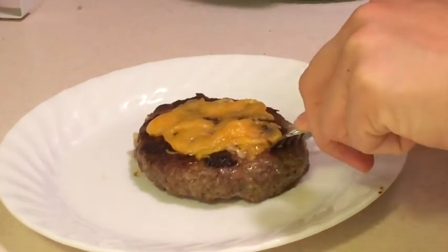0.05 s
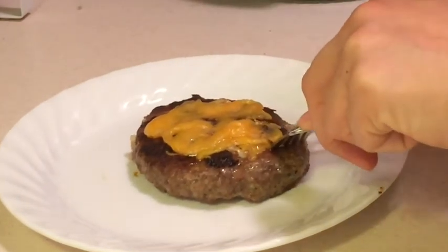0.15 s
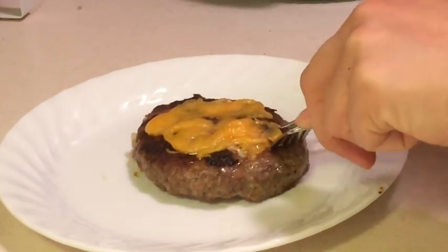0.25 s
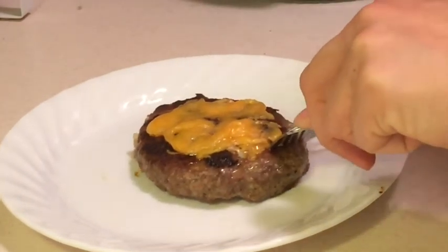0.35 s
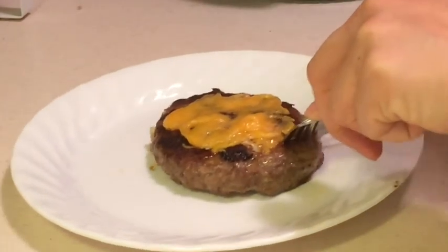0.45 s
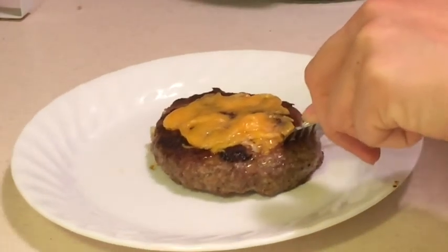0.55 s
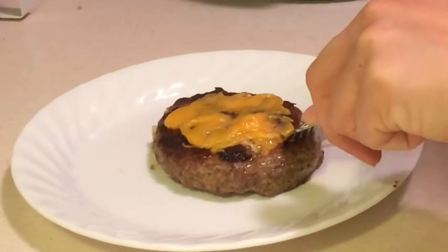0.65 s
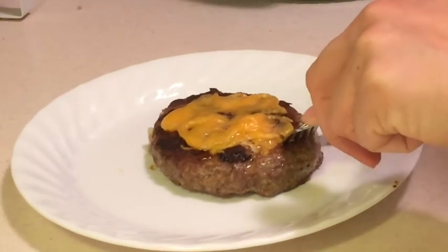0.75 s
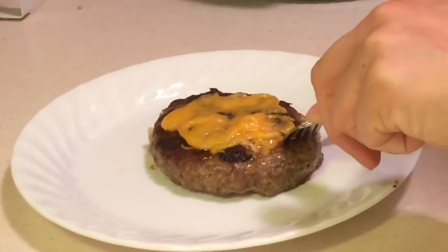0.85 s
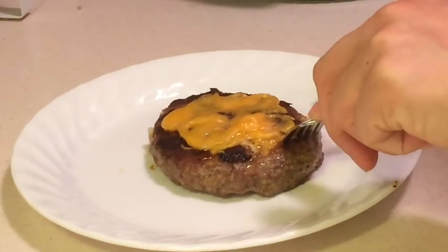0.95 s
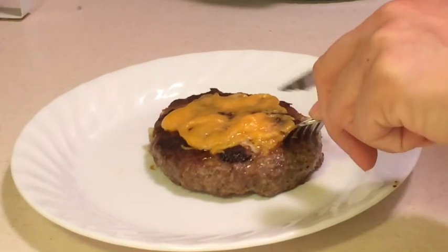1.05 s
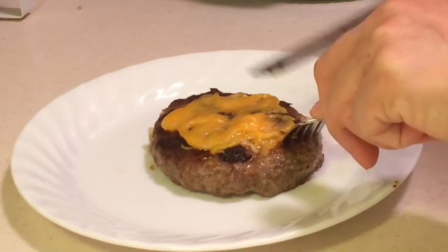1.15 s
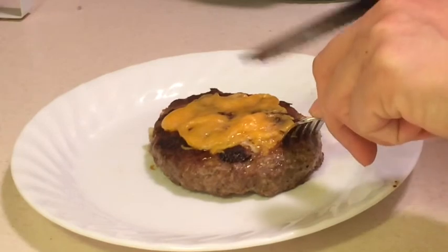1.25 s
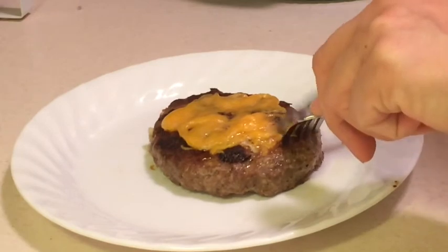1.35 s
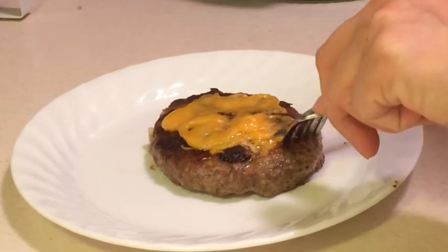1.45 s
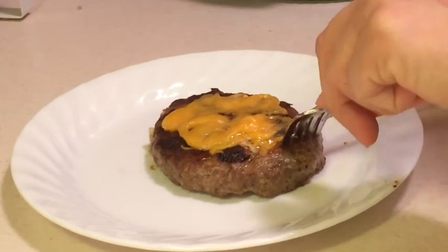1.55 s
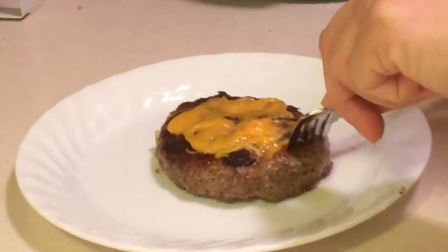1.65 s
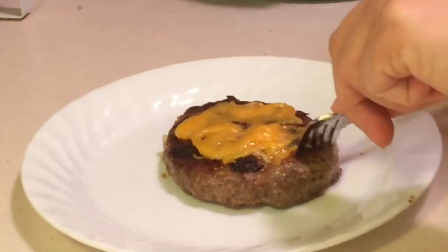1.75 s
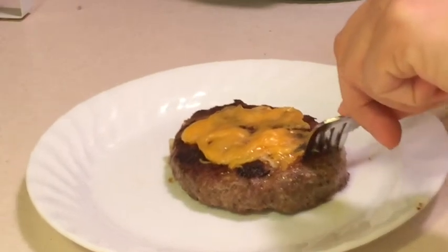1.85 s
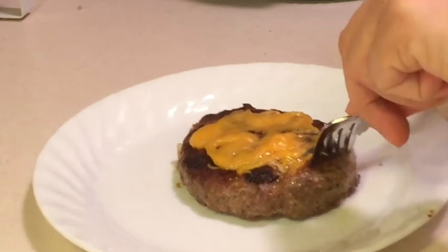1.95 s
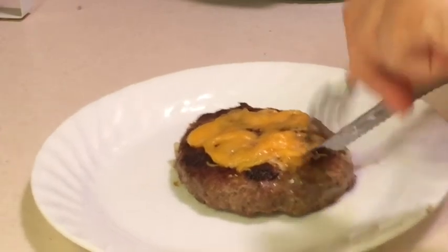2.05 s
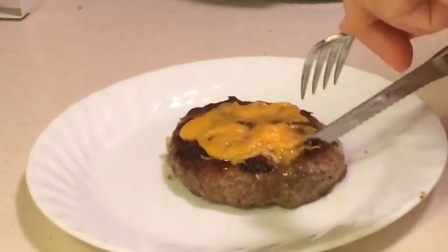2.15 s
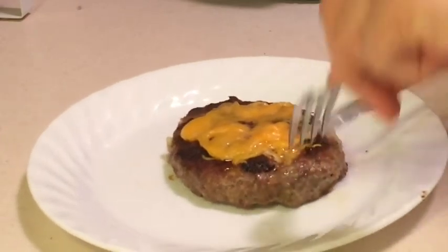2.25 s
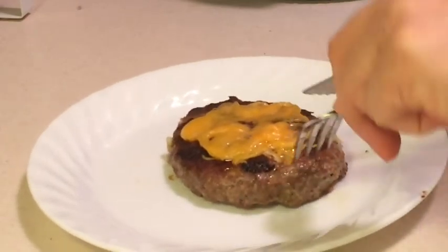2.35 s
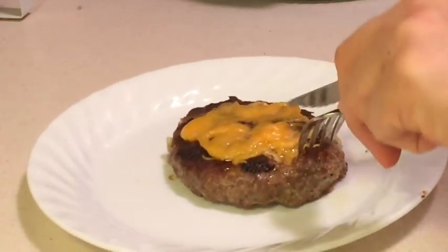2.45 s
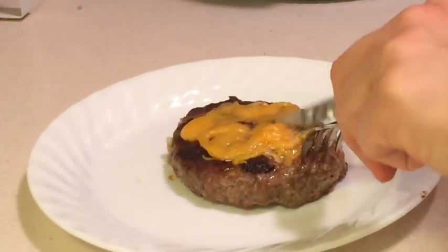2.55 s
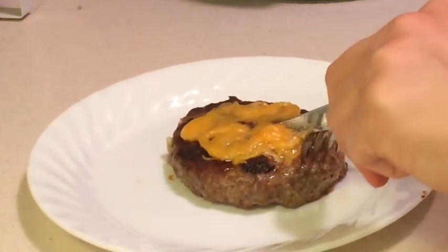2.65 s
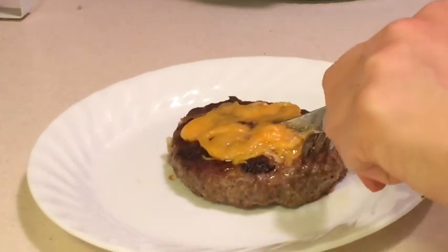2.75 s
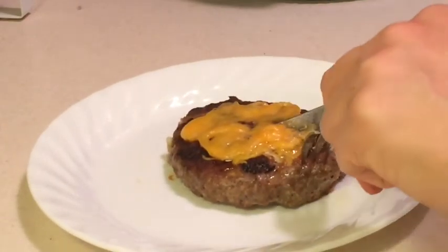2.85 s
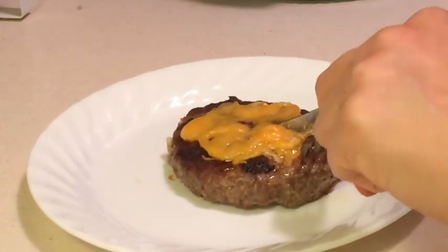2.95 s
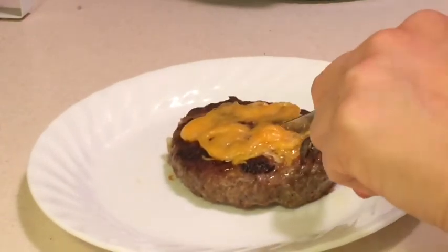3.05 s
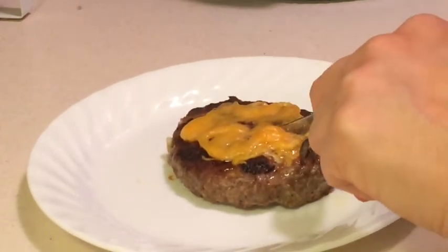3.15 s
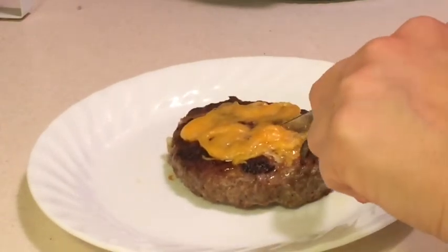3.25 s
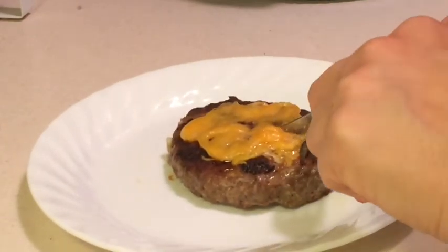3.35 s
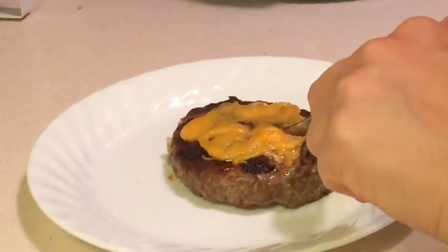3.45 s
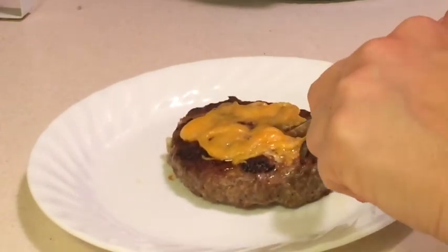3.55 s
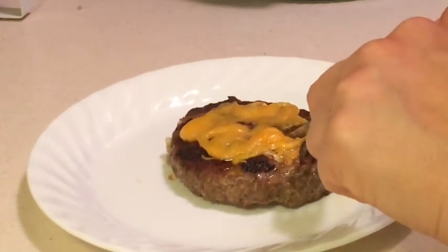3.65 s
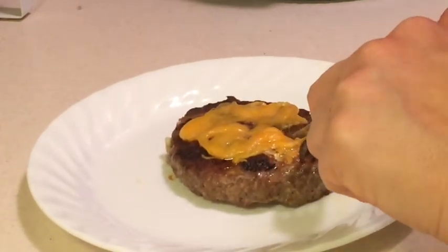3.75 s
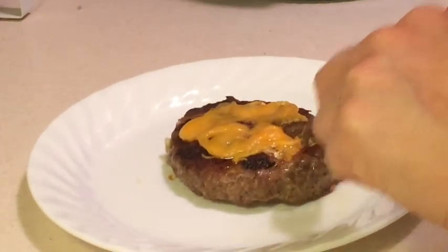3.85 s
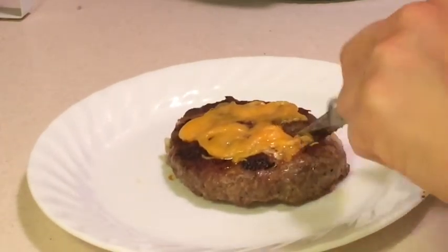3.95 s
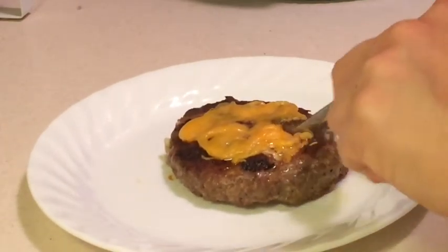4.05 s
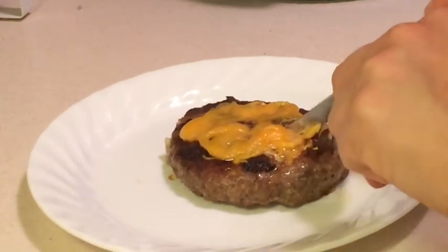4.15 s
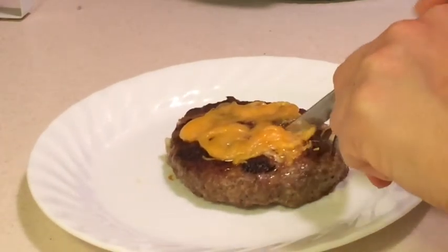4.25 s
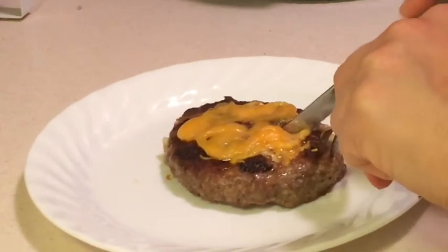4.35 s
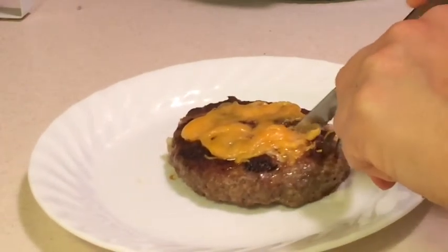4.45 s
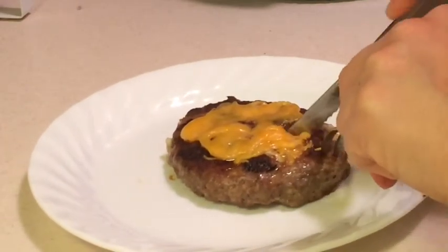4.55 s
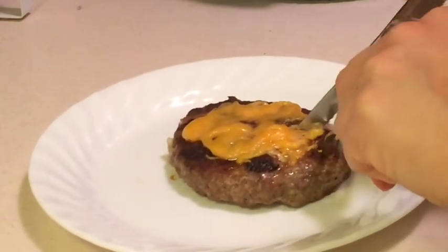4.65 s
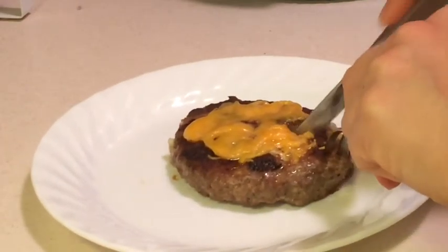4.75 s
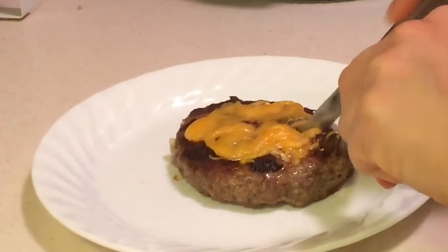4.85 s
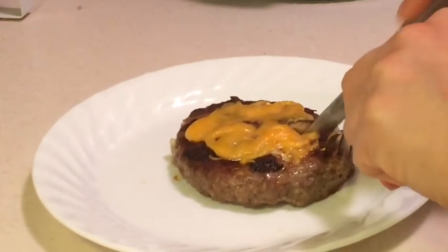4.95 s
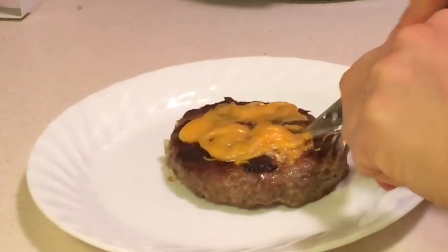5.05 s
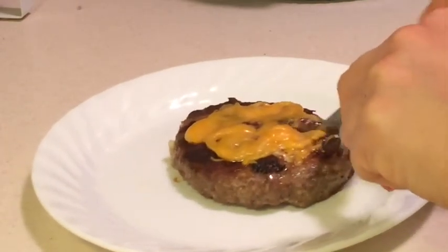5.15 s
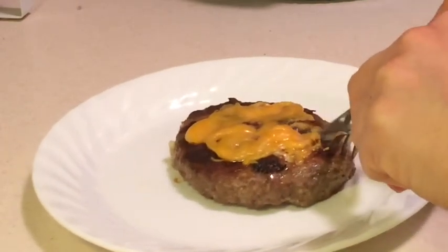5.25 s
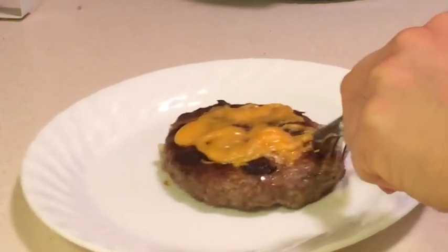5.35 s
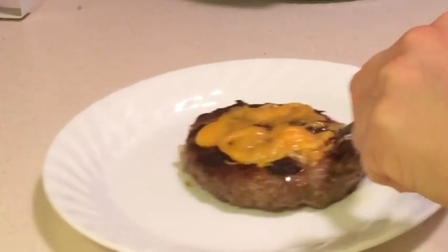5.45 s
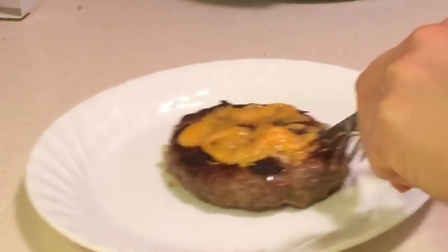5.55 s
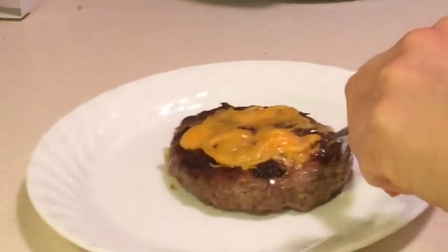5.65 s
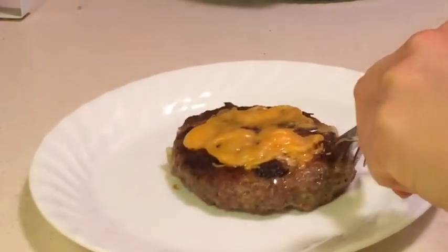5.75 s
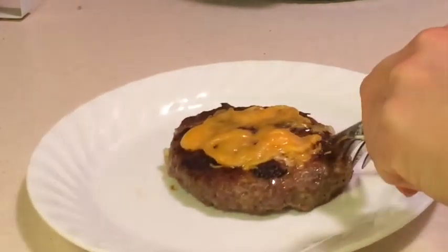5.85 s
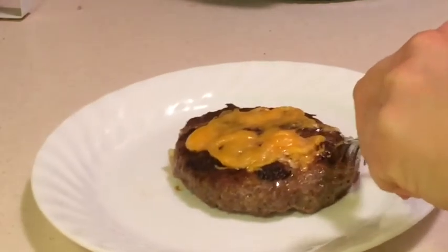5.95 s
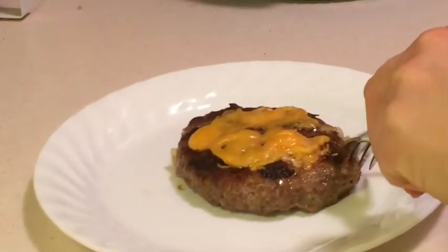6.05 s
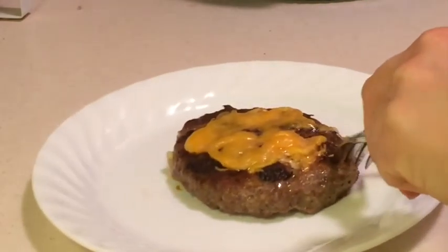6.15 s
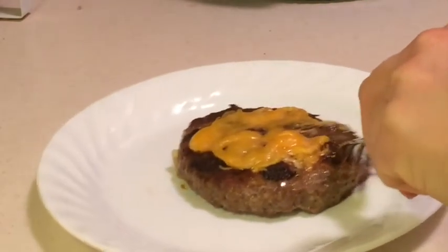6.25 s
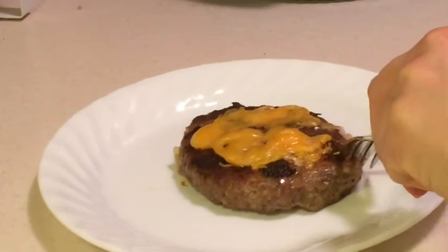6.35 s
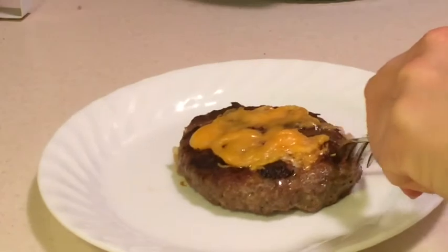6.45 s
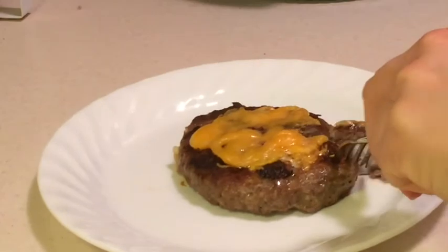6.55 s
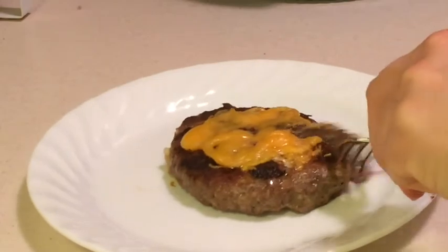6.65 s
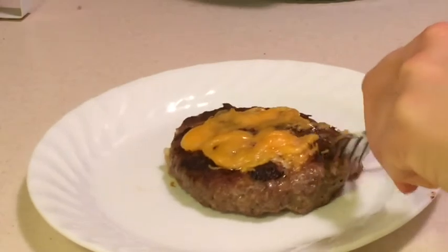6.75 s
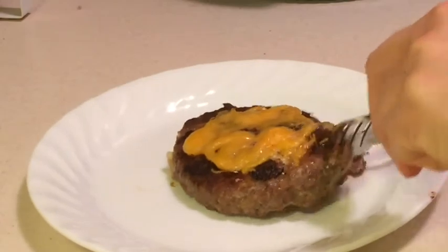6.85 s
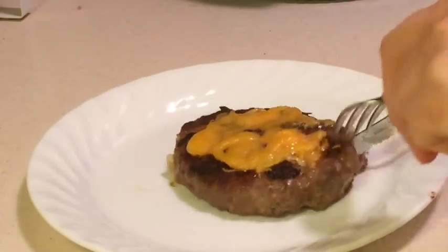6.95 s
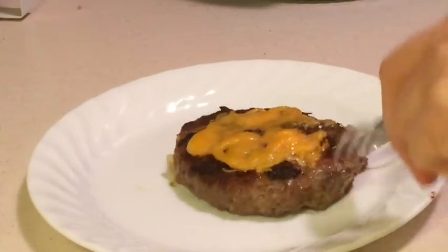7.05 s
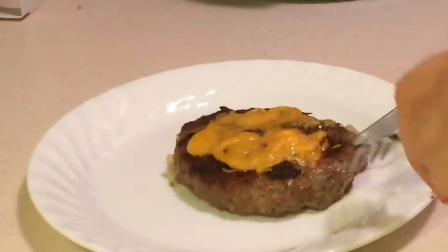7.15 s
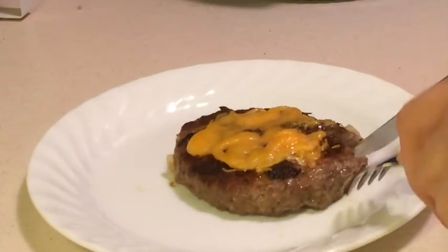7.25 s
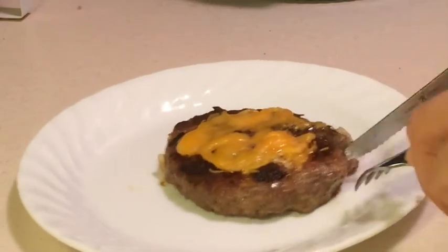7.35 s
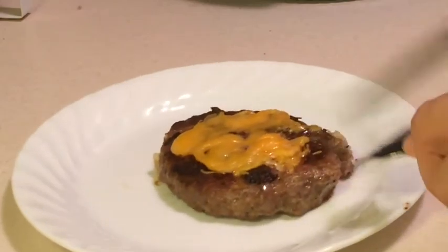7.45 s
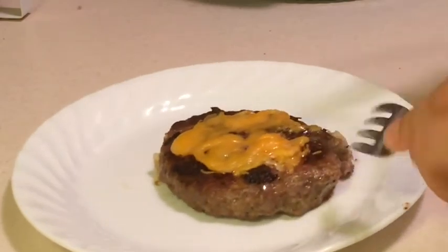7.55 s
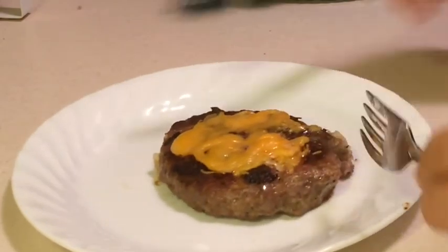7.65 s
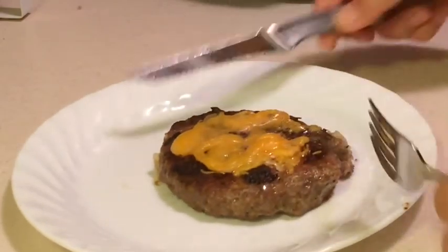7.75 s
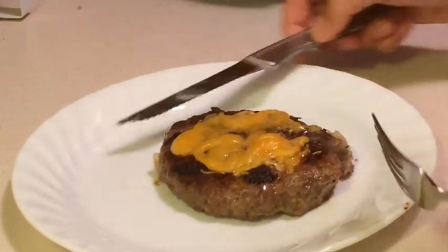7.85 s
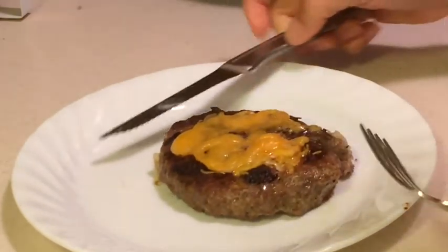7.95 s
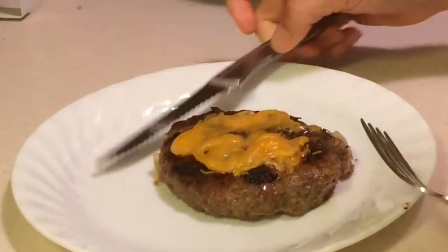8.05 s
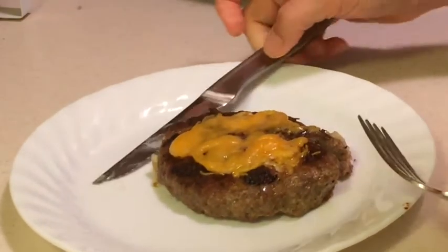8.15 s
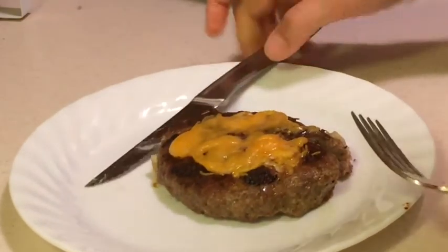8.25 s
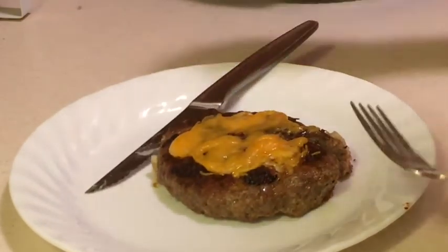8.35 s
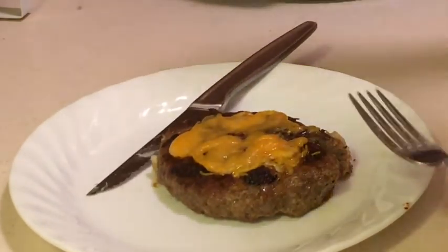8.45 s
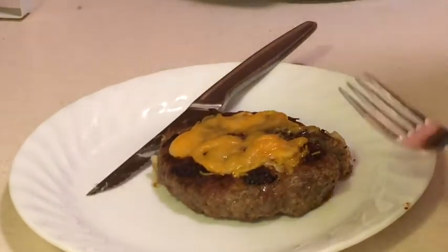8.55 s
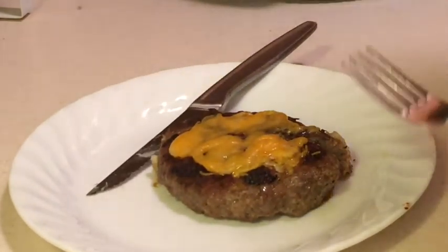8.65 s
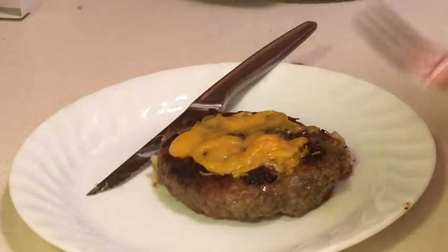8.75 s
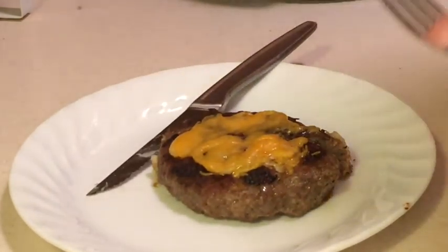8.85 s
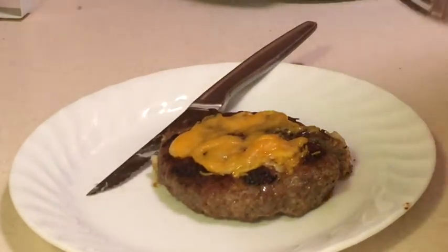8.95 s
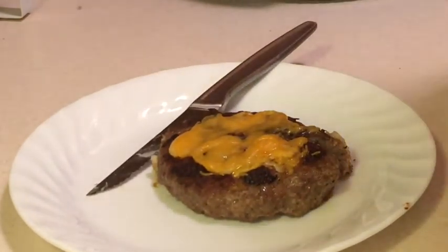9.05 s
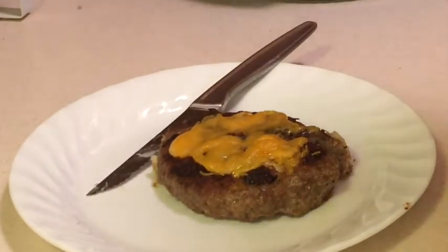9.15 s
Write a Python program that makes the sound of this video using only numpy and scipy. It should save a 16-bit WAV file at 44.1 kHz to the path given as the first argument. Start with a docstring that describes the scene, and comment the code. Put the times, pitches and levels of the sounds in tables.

```python
"""First, meat rustles and juices tick as a knife and fork cut a patty on a ceramic plate in a quiet kitchen.
Steel taps ring crowds of damped plate modes; strokes combine filtered clicks, plate graze and soft thuds.
The knife is laid down: it bounces, clatters on the rim and settles, as struck and chattering modes.
A far appliance hums in filtered noise; gain control ducks loud sound, notably the clatter, then recovers."""
import sys
import numpy as np
from scipy import signal
from scipy.fft import rfft, irfft, next_fast_len
from scipy.io import wavfile
from scipy.ndimage import uniform_filter1d

SR = 44100
rng = np.random.default_rng(int(sys.argv[2]) if len(sys.argv) > 2 else 0)


def persist_wave(psi):
    """Save psi, clipped to +-1, as 16-bit WAV."""
    counts = np.round(np.clip(psi, -1, 1) * 32767).astype(np.int16)
    wavfile.write(sys.argv[1], SR, np.atleast_2d(counts).T)


N = 405279

# Bass tilt: dB reached two octaves below 4.8 kHz. Treble tilt: dB per octave above it.
# Blow levels are nominal; mode t60 values are before damping.
# Steel taps the plate: (time [s], level [dB], bass tilt [dB], treble tilt [dB/octave])
PLATE_TAPS = [(0.2218, -23, -8.5, -1), (0.5414, -38, -12, 2), (4.8743, -22.5, -3, -10.5),
              (5.068, -45.5, 7, 1), (5.0955, -9.5, -3.5, -4.5), (5.3446, -12, -4.5, 2.5),
              (5.569, -23.5, -8.5, -2.5), (5.906, -25.5, -11, 1.5), (6.144, -16.5, -10, 3)]
TAP_DAMPING = 1.49
# Crowds of plate modes: (centre [Hz], spread [Hz], relative level [dB], median t60 [s])
PLATE_CROWDS = [(171, 33, 0.5, 0.046), (496.3, 25, -1.5, 0.11), (843, 250, -2, 0.069), (1068, 12, -9, .13),
                (1199, 156.6, -1.5, 0.12), (1773, 290, -20, 0.045), (2463, 190, -10, 0.064),
                (3449, 310, -1, 0.094), (4230, 260, -13.5, 0.12), (5340, 250, -17, 0.034),
                (6225, 300, -4, 0.11), (7170, 370, -15.5, 0.16), (10120, 270, -3.5, 0.066),
                (14100, 400, -21.5, .06)]
# Steel clinks: (time [s], fork level [dB], knife handle level [dB], fork bass tilt [dB])
STEEL_CLINKS = [(0.2213, -23, -55, 0), (.946, -54, -50.5, -8), (1.453, -30.5, -29, -5)]
# Crowds of modes of the buried tines: (centre [Hz], spread [Hz], relative level [dB], median t60 [s])
FORK_CROWDS = [(948, 68, 1, 0.053), (4380, 190, -2, .055), (7530, 90, -4, .05), (8230, 87, -6, .05),
               (9300, 100, -9, 0.054)]
# Knife tip bounces: (time [s], blade level [dB], handle level [dB])
TIP_BOUNCES = [(8.179, -28, -28.5), (8.2115, -29.5, -19), (8.232, -31, -28.5), (8.252, -40.5, -27.5)]
# Knife lands on the rim: (time [s], rim level [dB], blade level [dB], rim bass tilt [dB])
RIM_LANDINGS = [(8.281, -3, -9, -3), (8.2926, -8.5, -9.5, 3.5), (8.3004, 0, -21, -0.5),
                (8.308, -3, -22.5, 4.5), (8.319, -4, -20, -1), (8.328, -4, -19, -1), (8.346, -13, -23.5, 2),
                (8.367, -23.5, -34, 6)]
# Knife handle modes: (frequency [Hz], relative level [dB], t60 [s])
HANDLE_MODES = [(5650, 0, 0.13), (6800, -5.5, 0.065), (7400, -6, 0.13), (8000, -4.5, 0.085),
                (8740, -7, 0.06), (9760, -5, 0.1), (12780, -5, 0.1), (14250, -3.5, 0.11)]
# Knife blade modes: (frequency [Hz], relative level [dB], t60 [s])
BLADE_MODES = [(1530, -2, 0.076), (2170, -7, .06), (3690, -4, 0.055), (5280, 5.5, 0.056),
               (6410, -2.5, 0.076), (8880, -5.5, 0.072), (10700, -5, 0.07), (12940, -4, 0.084)]
# Modes of the plate's free rim: (frequency [Hz], relative level [dB], t60 [s])
RIM_MODES = [(242, -15, 0.17), (500, -13.5, 0.14), (1240, -7, 0.045), (1529, -7.5, 0.05), (1760, -6, 0.09),
             (2425, -4, 0.085), (2700, -6.5, 0.098), (3080, -3.5, 0.049), (4100, 0.5, 0.074),
             (4840, -3, .08), (5100, 5, 0.059), (6130, 1.5, 0.093), (7420, -1, 0.05), (8600, -6, .1),
             (10820, -7, 0.09), (11300, -10, 0.1), (12200, -7, .09), (14000, -7, .08), (15000, -9.5, .08)]
# Drags through the meat: (time [s], nominal length [s], rustle level [dB], plate graze level [dB])
MEAT_STROKES = [(0, 0.061, -58, -59), (0.227, 0.051, -54, -76), (0.347, 0.15, -59.5, -59.5),
                (0.42, 0.12, -53.5, -75), (0.669, 0.14, -60, -58.5), (1.643, 0.16, -58.5, -62),
                (1.812, 0.18, -61, -61.5), (2.076, 0.12, -53, -61), (2.44, 0.13, -65, -80),
                (3.898, 0.031, -62, -81), (4.199, 0.032, -64, -67), (4.31, 0.11, -62, -78),
                (4.49, 0.097, -64.5, -71), (4.686, 0.19, -59.5, -100), (4.821, 0.042, -57, -56),
                (5.018, 0.11, -55, -84), (5.138, 0.085, -59, -70), (5.252, 0.15, -54, -85),
                (5.447, 0.092, -52, -59), (5.555, 0.097, -53.5, -62), (5.703, 0.069, -57.5, -71),
                (5.888, 0.037, -50.5, -63), (5.98, 0.058, -62.5, -69.5), (6.19, 0.17, -58, -61),
                (6.396, 0.075, -58.5, -57.5), (6.533, 0.077, -52.5, -57), (6.629, 0.13, -57, -54.5),
                (6.966, 0.056, -62.5, -76), (7.303, 0.16, -62, -72), (7.762, 0.13, -61.5, -74),
                (8.76, 0.066, -68, -67)]
# Faint continuous rustle beneath the strokes:
# (time [s], nominal length [s], rustle level [dB], plate graze level [dB])
LOW_RUSTLE = [(0, 0.4, -64, -80), (4.2, 2.13, -67.5, -78)]
# Spectrum of the fibre rustle: (frequency [Hz], relative density [dB/Hz])
RUSTLE_SPECTRUM = [(300, -29.5), (1200, -1), (3000, -8), (6000, -9.5), (10000, -14.5), (15000, -20.5),
                   (16500, -35)]
# Clear wet ticks of meat and juice, plus at 4.834 s a tick-like light graze of steel: (time [s], level [dB],
# centre [Hz])
WET_TICKS = [(0.1077, -48, 9000), (0.1705, -51, 8300), (0.335, -51, 9000), (0.6684, -55, 11200),
             (0.7283, -48, 10900), (0.7786, -48, 6440), (0.933, -50, 6070), (1.0183, -53, 11000),
             (1.9424, -45, 5000), (2.139, -35.5, 9900), (2.2894, -53, 11100), (3.1537, -55, 11000),
             (3.4473, -56, 11000), (3.917, -35, 8300), (3.984, -52, 10300), (4.0755, -53, 7600),
             (4.0963, -53, 9700), (4.1735, -55, 11000), (4.213, -47, 8300), (4.6858, -47, 7360),
             (4.834, -34.5, 6400), (5.321, -45, 9600), (5.7453, -48, 9850), (6.2693, -44, 6200),
             (6.5868, -48.5, 6440), (6.819, -49, 9900), (6.863, -51, 8000), (6.8867, -51, 12200),
             (7.447, -49, 8550)]
# Steel sliding or rocking on glaze: (peak time [s], frequency [Hz], level [dB], rise [s], fall [s])
GLAZE_TONES = [(.267, 1660, -47, .004, .004), (8.322, 3080, -4.5, .013, 0.01),
               (8.33, 4060, -15, .012, .009), (8.52, 1883, -43, .06, 0.016)]
# Spectrum of the room noise: (frequency [Hz], relative density [dB/Hz])
AIR_SPECTRUM = [(26, -35.5), (44, -6), (112, 1.5), (162, -18), (183, -3), (239, -9.5), (277, -7),
                (354, -8.5), (442, -9.5), (565, -15), (900, -13.5), (1540, -17.5), (15500, -47.5)]
# Appliance noise resonances: (frequency [Hz], width [Hz], level relative to air [dB])
AIR_RESONANCES = [(114.6, 56, -5.5), (248.8, 18.7, -4.5), (358.3, 6.8, -11), (400, 20, -15),
                  (630.3, 33, -14), (924, 190, -10)]
# Appliance hum: (time [s], rms level [dB])
HUM_LEVELS = [(0.0, -84), (5.3, -55), (9.19, -61)]

# Body styles: (bass tilt [dB], treble tilt [dB/octave], damping factor)
CLINK_HANDLE, BOUNCE_HANDLE = (0, 1.8, 1.9), (0, -1, 1)
BOUNCE_BLADE, LANDING_BLADE = (0, 3, 1.104), (-14, -6.5, 0.43)
# The rows supply the bass tilt here: (treble tilt [dB/octave], damping factor)
CLINK_FORK, LANDING_RIM = (-6.5, 1.3), (0, 1.2)
BEAT_DEPTH, BEAT_LOW_HZ, BEAT_HIGH_HZ = 0.37, 25, 142

# With the knife on the rim, new blows ring shorter and earlier ringing is choked.
SEATED_S, SEATED_DAMPING, SEATED_MUTE_DB_PER_S = 8.34, 3.4, 501
CLATTER_SWELL_S, CLATTER_HOLD_S, CLATTER_FADE_DB_PER_S = 0.022, 0.034, 749.5
TREMBLE_FADE_DB_PER_S, SETTLE_S, SETTLE_DB_PER_S, STILL_S = 97, 8.48, 450, 8.52
# Drives: (skid [dB], clatter onset [dB], full clatter [dB], tremble before its fade [dB])
RIM_DRIVE = (-69.5, -11.5, -8.5, -19.5)
BLADE_DRIVE = (-40.5, -29, -14, -20)
RASP_DRIVE = (-46, -15.5, -4.5, -23)
HELD_DB_PER_OCTAVE = 3  # blade bass loss below 5 kHz, lying across the plate

# Thud level for a stroke of -55 dB rustle and 0.1 s nominal length.
THUD_DB, THUD_PER_DB, THUD_DB_PER_DOUBLING = -56.5, 1.65, 2.5
FAINT_TICK_MAX_DB, FAINT_TICK_CENTRE_HZ, FAINT_TICKS_END_S = -55.5, 10100, 5.4
SINGING_WAVER_DB = 3.5
KITCHEN_T60_S, WALL_CUT_HZ, KITCHEN_DB = 0.19, 7000, -12
AIR_DB, HUM_HZ = -53, 59.5
GAIN_KNEE_DB, GAIN_SHARE, RELEASE_DB_PER_S = -17.5, 0.64, 30
CUTOFF_HZ = 16100


def cutlery_hits():
    """Taps, clinks, bounces and landings strike the modes of plate, fork, handle, blade and rim."""
    taps = [(*row, TAP_DAMPING) for row in PLATE_TAPS]
    hits = blows(taps, crowd(PLATE_CROWDS, count=22), 3, -11.0, 0.0021, crack_hz=12400)

    fork_rows = [(s, db, bass_db, *CLINK_FORK) for s, db, _, bass_db in STEEL_CLINKS]
    hits += blows(fork_rows, crowd(FORK_CROWDS, count=7), 2.0, -6.0, 0.0035, crack_hz=12100)

    handle_rows = struck(STEEL_CLINKS, CLINK_HANDLE, column=2)
    handle_rows += struck(TIP_BOUNCES, BOUNCE_HANDLE, column=2)
    hits += blows(handle_rows, HANDLE_MODES, 1.3, -8.0, 0.0088, crack_hz=15050)

    blade_rows = struck(TIP_BOUNCES, BOUNCE_BLADE, column=1)
    blade_rows += struck(RIM_LANDINGS, LANDING_BLADE, column=2)
    hits += blows(blade_rows, BLADE_MODES, 1.965, -7.5, 0.003, crack_hz=17060)

    treble_db, free_damping = LANDING_RIM
    choke = amp(-SEATED_MUTE_DB_PER_S * np.maximum(np.arange(N) / SR - SEATED_S, 0))
    for seated, damping, gain in ((False, free_damping, choke), (True, SEATED_DAMPING, 1)):
        rim_rows = [(s, db, bass_db, treble_db, damping)
                    for s, db, _, bass_db in RIM_LANDINGS if (s > SEATED_S) == seated]
        hits += gain * blows(rim_rows, RIM_MODES, 3.4, 13.0, 0.00017, crack_hz=13000)
    return hits


def blows(events, modes, scatter_db, crack_db, crack_s, crack_hz):
    """Each blow rings tilted, damped and beating modes, with a short noise crack."""
    hz, level_db, t60_s = np.transpose(modes)[:, :, None].astype(np.float32)
    out = np.zeros(N + SR // 4)
    t = np.arange(SR // 4, dtype=np.float32) / SR
    octaves = np.clip(np.log2(hz / 4800), -3, 0.8)
    shares = amp(level_db) / np.sqrt(np.sum(amp(level_db) ** 2))
    dull = signal.butter(2, crack_hz, fs=SR, output="sos")
    rise = 1 - np.exp(-t * hz / 1.7)  # build-up over a few cycles
    for s, blow_db, bass_db, treble_db, damping in events:
        tilt_db = np.where(octaves < 0, -bass_db / 2, treble_db) * octaves
        gains = shares * amp(tilt_db + rng.normal(0, scatter_db, hz.shape))
        phases = rng.uniform(0, 2 * np.pi, hz.shape).astype(np.float32)
        beat_hz = rng.uniform(BEAT_LOW_HZ, BEAT_HIGH_HZ, hz.shape).astype(np.float32)
        beats = 1 + BEAT_DEPTH * np.sin(2 * np.pi * beat_hz * t + 3 * phases)
        decay = np.exp(-float(np.log(1000) * damping) * t / t60_s)
        tones = np.sin(2 * np.pi * hz * t + phases)
        body = np.sum(gains * rise * beats * tones * decay, axis=0)

        hiss = signal.lfilter([1, -0.4], [1], rng.standard_normal(len(t)))
        crack_gain = amp(crack_db + min(treble_db, 0) / 2)
        crack = crack_gain * signal.sosfilt(dull, hiss) * np.exp(-t / crack_s)
        at = round(s * SR)
        out[at:at + len(t)] += amp(blow_db) * (body + crack)
    return out[:N]


def struck(events, style, column):
    """Rows for one body: time, level from the column, shared tilts and damping."""
    return [(row[0], row[column], *style) for row in events]


def crowd(families, count):
    """Spread each family into a bell of close modes with unequal decay rates."""
    places = np.linspace(-2, 2, count) + rng.uniform(-0.2, 0.2, (len(families), count))
    modes = []
    for (hz, spread_hz, db, t60_s), row in zip(families, places):
        for z in row:
            modes.append((hz + spread_hz * z, db - 1.2 * z ** 2, t60_s * amp(rng.normal(0, 0.64))))
    return modes


def chatter():
    """The knife skids, clatters and trembles: quick touches ring rim and blade and spit a rasp."""
    t = np.arange(N) / SR
    landed_s = t - RIM_LANDINGS[0][0]
    moving = (t > TIP_BOUNCES[0][0]) & (t < STILL_S + 0.03)
    swell = np.clip(landed_s / CLATTER_SWELL_S, 0, 1)
    fade_db = CLATTER_FADE_DB_PER_S * np.maximum(landed_s - CLATTER_SWELL_S - CLATTER_HOLD_S, 0)
    calm_db = TREMBLE_FADE_DB_PER_S * landed_s + SETTLE_DB_PER_S * np.maximum(t - SETTLE_S, 0)

    def drive_db(skid, onset, full, tremble):
        """Skid before the landing, then the stronger of clatter and tremble."""
        clatter_db = onset + (full - onset) * swell - fade_db
        tremble_db = tremble - calm_db - 99 * (swell < 1)
        return np.where(landed_s < 0, skid, np.maximum(clatter_db, tremble_db))

    still_db = np.where(moving, 0, -200)
    touches = grains(900, spread_db=2.5) * amp(2.2 * lumps(size=350))
    spit = rng.standard_normal(400) * np.exp(-np.arange(400) / 30)
    band = signal.butter(1, [2800, 11000], "band", fs=SR, output="sos")
    rasp = rms_one(signal.sosfilt(band, signal.fftconvolve(touches, spit)[:N]))
    held = [(hz, db + HELD_DB_PER_OCTAVE * min(np.log2(hz / 5000), 0), t60_s)
            for hz, db, t60_s in BLADE_MODES]
    rings = through(touches, drive_db(*RIM_DRIVE) + still_db, RIM_MODES, SEATED_DAMPING)
    rings += through(touches, drive_db(*BLADE_DRIVE) + still_db, held, 1.6)
    rings *= np.exp(-np.maximum(t - STILL_S, 0) / 0.013)  # muted at rest
    return rings + moving * amp(drive_db(*RASP_DRIVE)) * rasp


def rubbing():
    """Fibre snaps rustle in clumps, teeth on glaze drive the plate, the patty thuds as it gives."""
    power = np.full((3, N), 1e-14)
    for s, length_s, rustle_db, graze_db in MEAT_STROKES + LOW_RUSTLE:
        thud_db = THUD_DB + THUD_PER_DB * (rustle_db + 55)
        thud_db += THUD_DB_PER_DOUBLING * np.log2(10 * length_s)
        levels_db = [rustle_db, graze_db, thud_db]
        at = round(s * SR)
        swell = signal.windows.tukey(round(length_s * SR * 1.554), 0.85)
        power[:, at:at + len(swell)] += (amp(levels_db)[:, None] * swell) ** 2
    rustle, graze, thud = np.sqrt(power)

    snaps = grains(3000, spread_db=2.5) * amp(3.3 * lumps(size=500))
    fibres = coloured(snaps, RUSTLE_SPECTRUM)
    flesh_spectrum = [(120, -18), (250, -7.0), (500, -5.0), (900, -17.0), (2000, -31)]
    flesh = coloured(rng.standard_normal(N), flesh_spectrum)
    # Light teeth favour the high crowds.
    bands = [(hz, db + 1.46 * np.log2(hz / 4800), 3.3 / spread_hz)
             for hz, spread_hz, db, _ in PLATE_CROWDS]
    teeth = through(grains(2500, spread_db=1.0), 20 * np.log10(graze), bands, 0.96)
    return rustle * fibres + teeth + thud * flesh


def through(x, level_db, modes, damping):
    """Small contacts under a level curve ring a body; steady contacts of rms 1 give about rms 1."""
    mode_power = [amp(db) ** 2 * t60_s / damping * SR / (12 * np.log(10)) for hz, db, t60_s in modes]
    contacts = rms_one(x) * amp(level_db)
    out = sum(amp(db) * ring(contacts, hz, t60_s / damping) * (-1) ** k
              for k, (hz, db, t60_s) in enumerate(modes))
    return out / np.sqrt(sum(mode_power))


def ticks():
    """Wet ticks are tiny band-passed noise bursts with short fizzing tails."""
    out, t = np.zeros(N + 2000), np.arange(2000) / SR
    shape = np.exp(-t / 0.0007) + amp(-17) * np.exp(-t / 0.02)
    for s, level_db, hz in WET_TICKS + faint_ticks(count=16):
        band = signal.butter(2, [0.79 * hz, min(1.34 * hz, 18000)], "band", fs=SR, output="sos")
        at = round(s * SR)
        burst = signal.sosfilt(band, 2 * shape * rng.standard_normal(2000))
        out[at:at + 2000] += amp(level_db) * burst
    return out[:N]


def faint_ticks(count):
    """Rows of small ticks at random moments, levels and pitches."""
    when, level, pitch = rng.random((count, 3)).T
    hz = FAINT_TICK_CENTRE_HZ * 1.6 ** (pitch - 0.5)
    return list(zip(when * FAINT_TICKS_END_S, FAINT_TICK_MAX_DB - 6 * level, hz))


def singing():
    """Steel sliding or rocking on glaze: each tone wavers under a lopsided bell."""
    out, waver = np.zeros(N), amp(SINGING_WAVER_DB * lumps(size=200))
    for s, hz, db, rise_s, fall_s in GLAZE_TONES:
        t = np.arange(N) / SR - s
        bell = np.exp(-0.5 * (t / np.where(t < 0, rise_s, fall_s)) ** 2)
        out += amp(db) * np.sin(2 * np.pi * hz * t) * bell
    return out * waver


def kitchen(x):
    """Dense reflections swell over 12 ms; the treble dies twice as fast."""
    t = np.arange(SR // 2) / SR
    white = rng.standard_normal(len(t))
    low = signal.sosfilt(signal.butter(1, WALL_CUT_HZ, fs=SR, output="sos"), white)
    fall = amp(-60 * t / KITCHEN_T60_S)
    tail = (low * fall + (white - low) * fall ** 2) * np.clip(t / 0.012, 0, 1)
    return signal.fftconvolve(x, tail / np.sqrt(np.sum(tail ** 2)))[:N]


def room_tone():
    """Far appliance: broad shaped noise, a few resonances and a low sine hum."""
    air = coloured(rng.standard_normal(N), AIR_SPECTRUM)
    white = rng.standard_normal(N)
    peaks = sum(amp(db) * rms_one(ring(white, hz, 3.0 / width_hz))
                for hz, width_hz, db in AIR_RESONANCES)
    t = np.arange(N) / SR
    times_s, levels_db = np.transpose(HUM_LEVELS)
    hum = amp(np.interp(t, times_s, levels_db)) * np.sqrt(2) * np.sin(2 * np.pi * HUM_HZ * t)
    return amp(AIR_DB) * (air + peaks) + hum


def amp(db):
    """dB to gain."""
    return 10 ** (np.asarray(db) / 20)


def rms_one(x):
    """Scale to rms 1."""
    return x / np.sqrt(np.mean(x ** 2) + 1e-20)


def coloured(x, spectrum):
    """Shape a noisy signal by a (frequency [Hz], level [dB]) table; rms 1."""
    size = next_fast_len(N)
    hz, db = np.transpose(spectrum)
    bins_hz = np.maximum(np.arange(size // 2 + 1) * SR / size, 1)
    gains = amp(np.interp(np.log(bins_hz), np.log(hz), db))
    return rms_one(irfft(rfft(x, size) * gains, size)[:N])


def ring(clicks, hz, t60_s):
    """Two-pole resonator: a unit click starts a decaying sine of height 1."""
    r, w = amp(-60 / (t60_s * SR)), 2 * np.pi * hz / SR
    return signal.lfilter([0, np.sin(w)], [1, -2 * r * np.cos(w), r * r], clicks + 1e-18)


def grains(per_s, spread_db):
    """Random clicks of uneven size and sign."""
    sizes = amp(spread_db * np.minimum(rng.exponential(1, N), 4)) * rng.choice([-1, 1], N)
    return sizes * (rng.random(N) < per_s / SR)


def lumps(size):
    """Slow random curve of rms 1, smoothed twice over the given number of samples."""
    once = uniform_filter1d(rng.standard_normal(N), size=size)
    return rms_one(uniform_filter1d(once, size=size))


def scene():
    """Near cutlery, its echo, singing steel and room tone."""
    near = cutlery_hits() + chatter() + ticks() + rubbing()
    return (near + amp(KITCHEN_DB) * kitchen(near) + singing() + room_tone())[None]


def record(dry):
    """Gain control ducks loud sound and releases steadily; peaks are rounded, both band ends cut."""
    t = np.arange(N) / SR
    level_db = 10 * np.log10(uniform_filter1d(dry[0] ** 2, size=880) + 1e-12)
    duck_db = GAIN_SHARE * np.maximum(level_db - GAIN_KNEE_DB, 0)
    held_db = np.maximum.accumulate(duck_db + RELEASE_DB_PER_S * t) - RELEASE_DB_PER_S * t
    out = 0.97 * np.tanh(dry * amp(-uniform_filter1d(held_db, size=440)) / 0.97)
    out = signal.sosfilt(signal.butter(3, 38, "high", fs=SR, output="sos"), out)
    return signal.sosfilt(signal.cheby2(16, 70, CUTOFF_HZ, fs=SR, output="sos"), out)


dry = scene()
out = record(dry)
persist_wave(out)
```